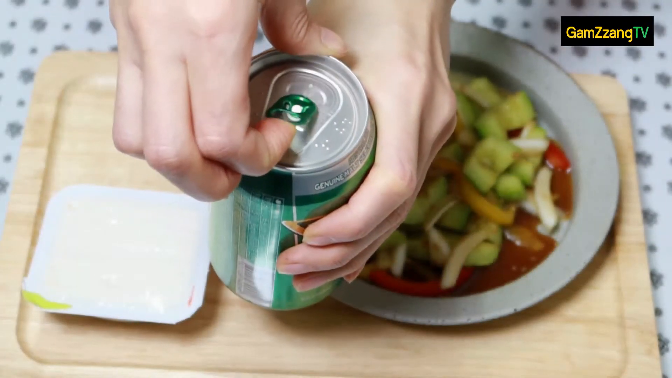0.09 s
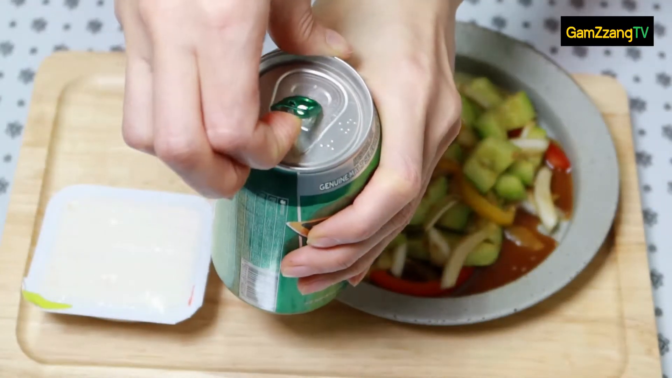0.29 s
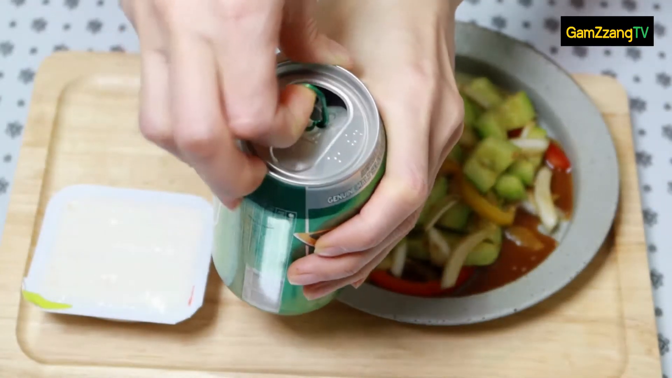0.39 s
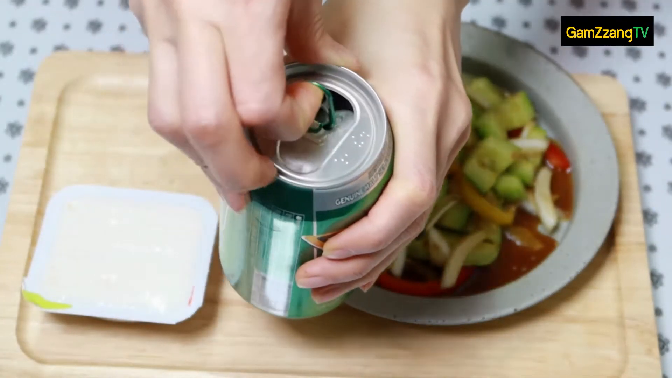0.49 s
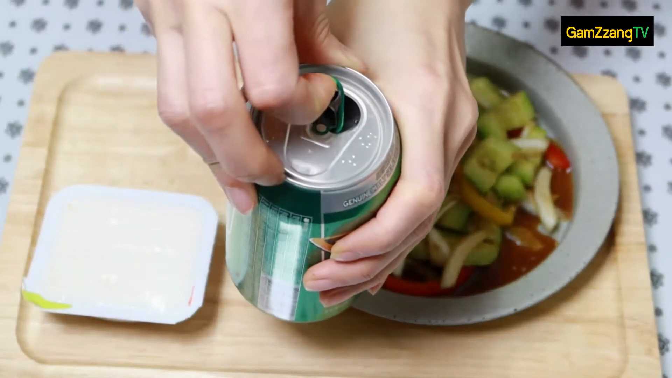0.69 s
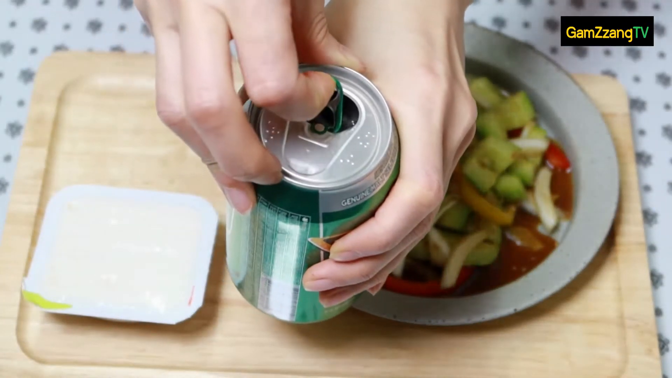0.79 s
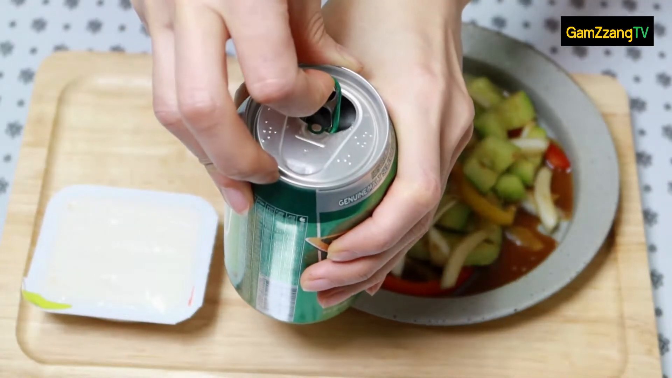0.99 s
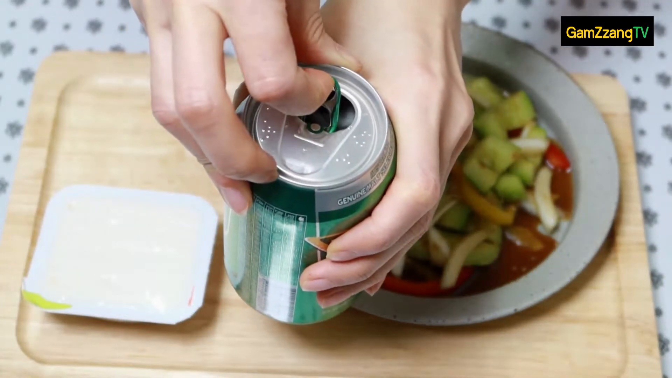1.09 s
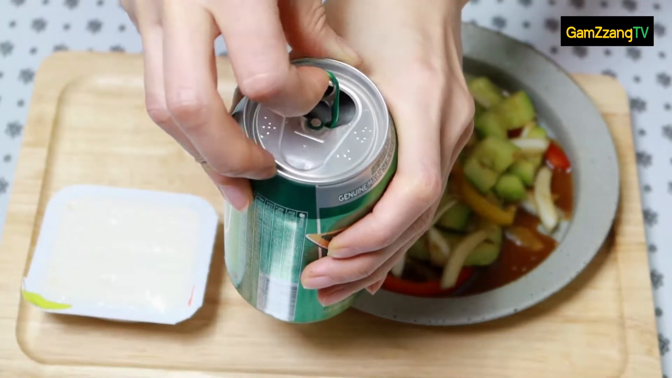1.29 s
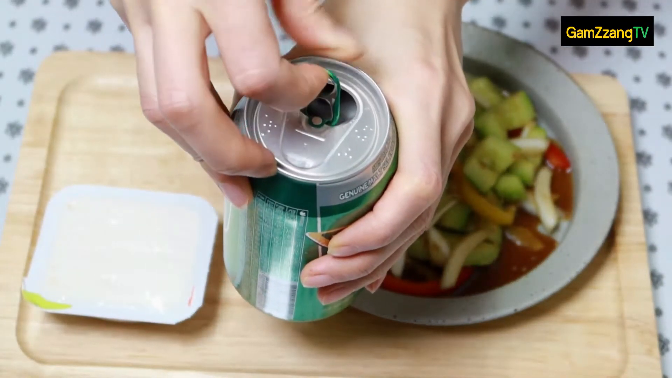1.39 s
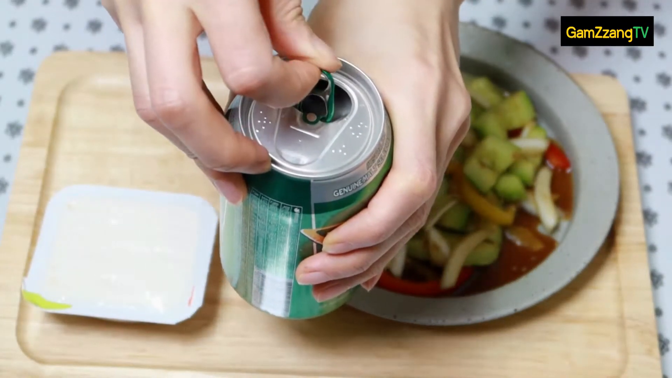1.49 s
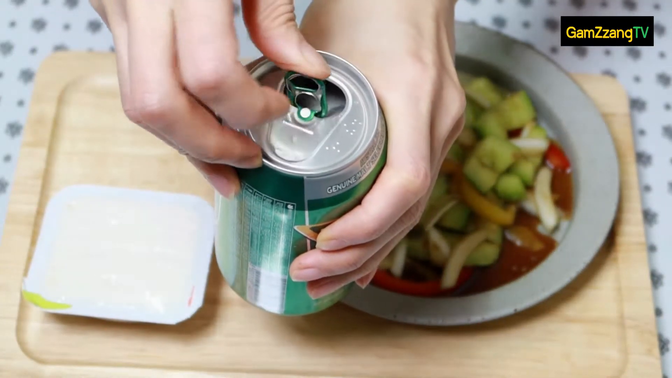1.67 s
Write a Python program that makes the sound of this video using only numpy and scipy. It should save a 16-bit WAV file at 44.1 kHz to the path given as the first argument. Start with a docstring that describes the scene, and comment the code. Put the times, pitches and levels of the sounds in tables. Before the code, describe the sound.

A ring-pull drink can opens close up in a small, quiet kitchen with soft room hiss and low fridge hum. At 0.23 s a sharp metallic crack releases a bright gas hiss, with another snap at 0.3, fading quickly. At 0.55-0.6 the lid tears in loud clustered snaps, then crackles and creaks until 0.85. Quiet follows; faint tab ticks and a tiny finger rub come at 1.47-1.6.

```python
"""A ring-pull can opened close to the microphone in a small kitchen, over room air, hiss and a fridge hum.
First the vent cracks, ringing the lid and thumping the can, and a flickering jet of gas hisses and roars out.
Then the lid tears along its score in a run of snaps with fine crackle, and the tab creaks as it is bent over.
Last the tab ticks and a finger slides on it as band-limited noise. Slips in the metal drive damped lid modes.
A short room tail follows the can; a gain control eases the level and loud snaps overload."""
import sys
import numpy as np
from scipy import signal
from scipy.fft import rfft, irfft
from scipy.io import wavfile
from scipy.ndimage import uniform_filter1d

SR = 44100
rng = np.random.default_rng(int(sys.argv[2]) if len(sys.argv) > 2 else 0)


def unload_audio(sound):
    """Save the sound as a 16-bit wav file, at the path given as the first command line argument."""
    columns = np.transpose(np.atleast_2d(sound))
    # keep every value between -1 and 1, then stretch to whole-number steps
    steps = np.round(np.clip(columns, -1, 1) * 32767)
    wavfile.write(sys.argv[1], SR, steps.astype(np.int16))


N = 74970  # length [samples]

# Room air and microphone hiss: (frequency [Hz], relative density [dB])
AIR_SPECTRUM = [(12, -50), (20, -11.5), (86, -3.5), (113, -9.5), (248, -14), (367, -16), (399, -18),
                (718, -19), (780, -23.5), (1220, -22), (1610, -28.5), (13500, -33.5), (16000, -34)]
# Wavering fridge hum: (frequency [Hz], level [dB], width of each of two resonator passes [Hz])
HUM_BANDS = [(41, -69, 8), (84, -59.5, 9), (99, -63, 9), (201.2, -69.5, 2.3), (249, -65, 4.8),
             (322, -65, 6), (363, -78, 6), (531, -78, 7.3)]
# Snaps of lid and tab: (time [s], level [dB], pitch rung hardest [Hz], brightness [dB per octave],
# length of the slip [ms], rattle after it [dB], pitch of the rattle [Hz], thump [dB])
SNAP_EVENTS = [(0.2276, -2, 3554, 4, 1.2, -9.5, 5940, -22.5), (0.2953, 0, 4560, 0.5, 2.43, -14, 2080, -17),
               (.518, -37, 3400, -2.5, 2, -12, 2100, -65), (0.5473, -17, 4800, 6.5, 2.5, -0.5, 4400, -28),
               (0.5552, 0.5, 4430, 2., 1.9, -11, 2090, -11), (.5621, -12, 2100, -9, 1.2, -33, 4374, -63),
               (0.5716, -22.5, 4800, 0, 0.41, 8, 4360, -62.5),
               (0.5753, -7, 13500, 11, 0.87, -13, 4646, -60), (0.5774, -18, 13300, -6, .8, -2.5, 7500, -60),
               (0.5841, -3.5, 13500, 2, 1., -5, 6090, -60), (0.5928, 0.5, 6700, -1.5, 2, -5, 3100, -2.5),
               (0.678, -10.5, 11500, 0., 0.71, -10.5, 1570, -70),
               (0.713, -30, 11600, -4, 1.8, -6.5, 3150, -70),
               (0.7437, -25.5, 3270, -2, 0.5, -4.5, 2130, -73),
               (.7551, -12, 7550, 1.5, 0.78, -9.5, 3400, -70),
               (0.7864, -14, 11800, -2, 2.3, -17.5, 1350, -72), (0.7906, -25, 3400, 0.5, 2, -3, 11600, -83),
               (0.803, -20, 6900, 17.5, 0.32, -8.5, 3410, -63),
               (0.8221, -8, 8850, -2, 0.56, -27.5, 1290, -49.5),
               (0.8241, -11.5, 7500, 2.5, 1.95, -9.5, 3490, -66),
               (1.4708, -21, 3090, -8.5, 0.33, -19.5, 1800, -70),
               (1.488, -42, 2860, -7, 0.54, -4, 2980, -59.5),
               (1.5016, -36.5, 1936, -8.5, .6, -7, 1500, -73.5),
               (1.533, -51, 13500, -11, 0.57, -10.5, 11000, -66.5),
               (1.5394, -35, 2260, -3, 2.05, -15.5, 11000, -68.5)]
# Modes of lid and can wall, damped by the hand: (frequency [Hz], level before leaning [dB], least width [Hz])
LID_MODES = [(950, -18.5, 300), (1352, -11, 390), (1616, -12, 210), (2148, -4.5, 380), (2920, -5.5, 100),
             (3473, 0, 110), (4434, 3, 240), (5900, 0.5, 1100), (6780, 1, 800), (7590, 5.5, 220),
             (8790, 2, 700), (10470, -1, 770), (11420, 0, 900), (13510, -2.5, 1400)]
# Escaping gas before the bass cut: (time [s], level of the jet [dB], level of the roar in the can [dB])
GAS_LEVELS = [(0.2286, -18.5, -34), (0.236, -20, -34.5), (.25, -4, -41), (0.277, -5, -34), (0.294, -8, -35),
              (.3, -26.5, -17), (0.313, -38.5, -28.5), (0.361, -39.5, -34), (0.412, -53.5, -46),
              (.46, -62.5, -54), (.51, -82, -72)]
# Colour of the jet: (frequency [Hz], relative density [dB])
JET_SPECTRUM = [(290, -62), (1000, -45), (1300, -31), (3000, -19), (3600, -21.5), (4340, -13.5),
                (4800, -16), (7500, -8), (10500, -6.5), (11500, -2), (16000, -9.5)]
# Air resonances inside the can: (frequency [Hz], relative level [dB], width of each of two passes [Hz])
CAN_AIR_MODES = [(2000, -4, 800), (4500, 0, 1500)]
# Decay of the kitchen's echo: (frequency [Hz], time to fall 60 dB [s])
ROOM_DECAY = [(500, .2), (1200, 0.16), (2200, .3), (4500, 0.14), (8000, .27), (14000, 0.091)]
# Fine crackle as the lid tears and bends, before the bass cut: (time [s], level [dB])
TEAR_LEVELS = [(.556, -42), (.59, -15), (.61, -31), (.64, -26.5), (.675, -30), (.70, -30), (.735, -39),
               (.77, -47.5), (.81, -44), (.84, -29.5), (.865, -50), (.88, -67)]
# Finger sliding on the tab: (time [s], level [dB])
RUB_LEVELS = [(1.515, -61), (1.53, -52), (1.54, -41.5), (1.555, -53), (1.575, -60), (1.6, -70.5)]
# Band of the finger's noise: (lower edge [Hz], upper edge [Hz])
RUB_BAND = (4000, 14800)

AIR_DB = -52
FOCUS_DB, RATTLE_FOCUS_DB = 15, 8  # lean of slip and rattle to their own pitch
ALSO_DB = 11  # the slip also leans to the pitch of its rattle
FOCUS_OCT = 0.28  # breadth of a lean [octaves]
RISE_MS, DETUNE = 0.12, 0.033  # onset of a ring; largest pitch shift of a mode [fraction]
JAG_DB = -7.0  # jagged part of a slip, against its clean part
RATTLE_MS, THUMP_HZ = 7.7, 300
THIN_HZ = 891  # a small can radiates little below this
JET_FLICKER_DB = 1.2  # rms
WHISTLE_HZ, WHISTLE_WIDTH_HZ, WHISTLE_DB = 11800, 710, -16.5  # level against the jet's noise
ROOM_DB, SIDE_DB = -13.5, -17.5  # room against the direct can; gain of the whole side signal
TEAR_PER_S, TEAR_SPREAD_DB, TEAR_AIR_DB = 4000, 2.5, -3.0
DUCK_SHARE, DUCK_FROM_DB, RECOVER_DB_PER_S = 0.12, -38, 32  # recovery of the tracked power
CEILING, EDGE_HZ = 1.2, 16000  # overload point [full scale]; band limit


def gain_of(db):
    """Amplitude factor of a level in dB."""
    return 10 ** (np.asarray(db) / 20)


def evened(x):
    """The signal scaled to rms 1."""
    return x / np.sqrt(np.mean(x ** 2) + 1e-20)


def read(points, hz):
    """Value of a (frequency [Hz], value) curve, interpolated over log frequency."""
    f, value = np.transpose(points)
    return np.interp(np.log(hz + 1), np.log(f + 1), value)


def level(curve):
    """Gain along a (time [s], level [dB]) curve, at -200 dB outside it."""
    s, db = np.transpose(curve)
    return gain_of(np.interp(np.arange(N) / SR, s, db, -200, -200))


def coloured(spectrum):
    """Noise of rms 1 with the given spectrum."""
    bins = rfft(rng.standard_normal(N))
    bins *= gain_of(read(spectrum, np.fft.rfftfreq(N, 1 / SR)))
    return evened(irfft(bins, N))


def resonate(x, hz, width_hz):
    """One damped resonance, with a peak gain of about 1."""
    r = np.exp(-np.pi * width_hz / SR)
    return 2 * signal.lfilter([1 - r], [1, -r * np.exp(2j * np.pi * hz / SR)], x).real


def resonate_twice(x, hz, width_hz):
    """Two equal resonances in a row, with steeper skirts than one."""
    return resonate(resonate(x, hz, width_hz), hz, width_hz)


def resonant_noise(hz, width_hz):
    """A wavering tone of rms 1: noise through two equal resonances."""
    return evened(resonate_twice(rng.standard_normal(N), hz, width_hz))


def thinned(x):
    """A small can radiates little bass."""
    return signal.sosfilt(signal.butter(4, THIN_HZ, "highpass", fs=SR, output="sos"), x)


def kitchen():
    """Room air and microphone hiss, with the wavering hum of a fridge compressor."""
    hum = sum(gain_of(db) * resonant_noise(hz, width) for hz, db, width in HUM_BANDS)
    return gain_of(AIR_DB) * coloured(AIR_SPECTRUM) + hum


def ring(tilt_db, focus_hz, focus_db, hold_ms=0, chance=np.zeros((2, 1, 1)), also_hz=1):
    """The lid's modes, driven for hold_ms and leaning to focus_hz; chance shifts their pitch and phase."""
    t = np.arange(600) / SR
    hz, db, width = np.transpose(LID_MODES)[:, :, None]
    lean = tilt_db * np.log2(hz / 4000)
    lean += focus_db * np.exp(-(np.log2(hz / focus_hz) / FOCUS_OCT) ** 2)
    lean += ALSO_DB * np.exp(-(np.log2(hz / also_hz) / FOCUS_OCT) ** 2)
    damping_hz = np.maximum(width, hz / 14)  # no mode rings sharper than a Q of 14
    decay = np.exp(-np.pi * damping_hz * np.maximum(t - hold_ms / 1000, 0))
    turns = hz * (1 + DETUNE * chance[0]) * t + chance[1]
    modes = gain_of(db + lean) * np.sqrt(width) * decay * np.sin(2 * np.pi * turns)
    out = modes.sum(0) * np.minimum(t * 1000 / RISE_MS, 1)
    return out / np.linalg.norm(out)


def snaps():
    """Each snap is a short slip, partly jagged, and a rattle: both ring the lid, and a pulse thumps the can."""
    rung, push = np.zeros(N + 8000), np.zeros(N + 8000)  # room for the last rings
    t = np.arange(2500) / SR
    jags = rng.standard_normal((len(SNAP_EVENTS), len(t)))
    chances = rng.uniform(-1, 1, (len(SNAP_EVENTS), 2, len(LID_MODES), 1))
    for event, jag, chance in zip(SNAP_EVENTS, jags, chances):
        s, db, hz, tilt_db, ms, rattle_db, rattle_hz, thump_db = event
        start = round(s * SR)
        shape = np.exp(-(t / (ms / 1000)) ** 2)
        slip = np.convolve(np.sign(jag) * shape, ring(tilt_db, hz, FOCUS_DB))
        slip *= gain_of(JAG_DB) / np.linalg.norm(slip)
        clean = ring(tilt_db, hz, FOCUS_DB, ms / 2, chance, rattle_hz)
        slip[:len(clean)] += clean
        fading_jag = jag * np.exp(-t / (RATTLE_MS / 1000))
        rattle = np.convolve(fading_jag, ring(tilt_db, rattle_hz, RATTLE_FOCUS_DB))
        snap = np.linalg.norm(shape) * slip + gain_of(rattle_db) * rattle  # longer slips carry more
        rung[start:][:len(slip)] += gain_of(db) * snap
        u = 2 * np.pi * THUMP_HZ * t
        thump = u * (2 - u) * np.exp(-u)  # one push and return
        push[start:][:len(t)] += gain_of(thump_db) * thump
    return thinned(rung[:N]) + push[:N]


def gas():
    """Turbulent jet through the cracked vent, flickering, with a fuzzy whistle; it also roars in the can."""
    flicker = evened(uniform_filter1d(rng.standard_normal(N), size=90))  # smoothed over 2 ms
    whistle = resonant_noise(WHISTLE_HZ, WHISTLE_WIDTH_HZ)
    jet = evened(coloured(JET_SPECTRUM) + gain_of(WHISTLE_DB) * whistle)
    roar = evened(sum(gain_of(db) * resonant_noise(hz, width) for hz, db, width in CAN_AIR_MODES))
    curve = np.array(GAS_LEVELS)
    steady = level(curve[:, :2]) * jet + level(curve[:, ::2]) * roar
    return thinned(gain_of(JET_FLICKER_DB * flicker) * steady)


def room(x):
    """The kitchen's echo: a noise tail whose bands die at their own speed."""
    hz, t, z = signal.stft(rng.standard_normal(SR // 2), SR, nperseg=256)
    fading = z * gain_of(-60 * t / read(ROOM_DECAY, hz)[:, None])
    tail = signal.istft(fading, SR, nperseg=256)[1]
    tail[:100] = 0  # the echo begins 2.3 ms after the direct sound
    return signal.fftconvolve(x, tail / np.linalg.norm(tail))[:N]


def tear():
    """Tiny slips of uneven size ring the lid all through the tearing and bending."""
    size = gain_of(TEAR_SPREAD_DB * np.minimum(rng.exponential(1, N), 4))
    slips = size * (rng.random(N) < TEAR_PER_S / SR)
    slips = evened(slips * rng.choice([-1., 1.], N))
    rung = signal.oaconvolve(slips, ring(tilt_db=2.04, focus_hz=1460, focus_db=12.5))[:N]
    direct = np.diff(slips, prepend=0)  # bright clicks straight into the air
    return level(TEAR_LEVELS) * evened(rung + gain_of(TEAR_AIR_DB) * direct)


def rub():
    """Soft bright noise of skin on metal."""
    band = signal.butter(2, RUB_BAND, "bandpass", fs=SR, output="sos")
    return level(RUB_LEVELS) * evened(signal.sosfilt(band, rng.standard_normal(N)))


def scene():
    """Nearly mono: can, kitchen and echo in the middle, a faint side signal of noise and smeared can sound."""
    can = snaps() + gas() + thinned(tear()) + rub()
    mid = can + gain_of(ROOM_DB) * room(thinned(can)) + kitchen()
    side = kitchen()
    side += gain_of(-6.0) * room(resonate_twice(can, 2300, 1800))
    side += gain_of(-26.0) * room(can)
    side *= gain_of(SIDE_DB)
    return np.array([mid + side, mid - side])


def record(dry):
    """Mild gain control that recovers slowly, hard overload, then the band limit."""
    power = signal.lfilter([1 / 400], [1, 1 / 400 - 1], (dry ** 2).mean(0))  # smoothed over 9 ms
    power_db = 10 * np.log10(power + 1e-12)
    fall = np.arange(N) * RECOVER_DB_PER_S / SR
    held_db = np.maximum.accumulate(power_db + fall) - fall  # rises with the peaks, falls steadily
    over_db = np.maximum(held_db - DUCK_FROM_DB, 0)
    clipped = np.clip(dry / gain_of(DUCK_SHARE * over_db), -CEILING, CEILING)
    band_limit = signal.firwin(511, EDGE_HZ, window=("kaiser", 9), fs=SR)
    return signal.oaconvolve(clipped, band_limit[None], "same")


dry = scene()
out = record(dry)
unload_audio(out)
```